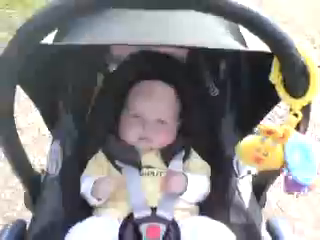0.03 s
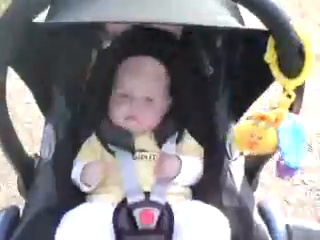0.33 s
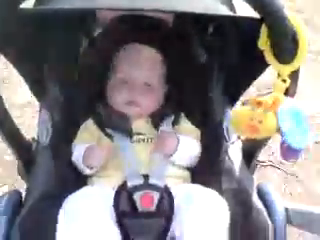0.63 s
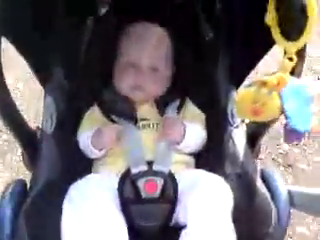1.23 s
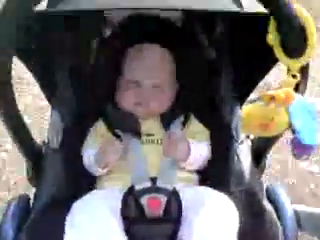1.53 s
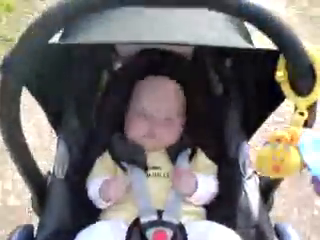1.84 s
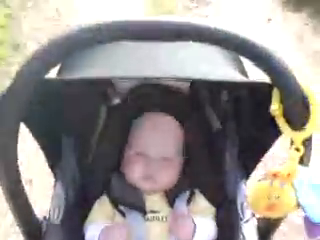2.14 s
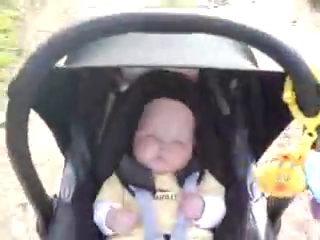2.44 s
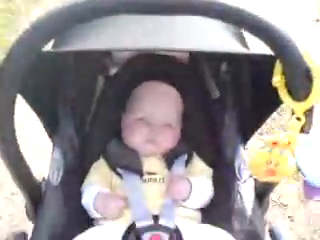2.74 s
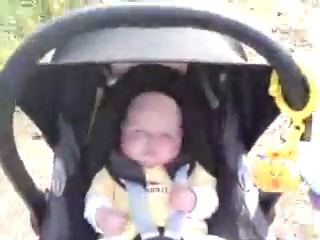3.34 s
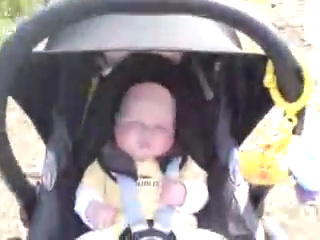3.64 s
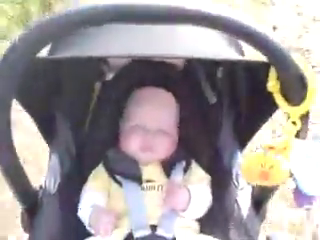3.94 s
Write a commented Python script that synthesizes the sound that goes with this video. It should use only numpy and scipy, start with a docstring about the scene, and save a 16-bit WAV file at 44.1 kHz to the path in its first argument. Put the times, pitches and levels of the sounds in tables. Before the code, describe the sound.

A stroller rolls over gritty ground outdoors, heard from its handle. The wheels crackle and rumble while the plastic frame rattles and knocks, small stones snap and a breeze buffets the microphone.

```python
"""A stroller is pushed over gritty ground, heard from its handle outdoors.
From the start grit crackles under the wheels and a breeze blows on the microphone; the wheels' rumble
and a faint low hum build up over 0.7 s. Meanwhile rough patches begin to shake the plastic frame,
joints knock, stones snap and dull bumps ring the seat shell. Eddies buffet the microphone most around
1 s. Chatter, knocks and snaps go on throughout, with a last burst of hard knocks near 3.6 s."""
import sys
import numpy as np
from scipy.fft import rfft, irfft, next_fast_len
from scipy.io import wavfile
from scipy.ndimage import map_coordinates

SR = 44100
rng = np.random.default_rng(int(sys.argv[2]) if len(sys.argv) > 2 else 0)


def master(y):
    """Save y as 16-bit WAV."""
    cut = np.clip(np.atleast_2d(y).T, -1, 1)
    pcm = np.round(cut * 32767)  # scale
    wavfile.write(sys.argv[1], SR, pcm.astype(np.int16))


N = 176400

# resonances of the plastic frame: frequency_hz, gain_db
FRAME_RESPONSE = [(100, 2), (290, 7.5), (450, 0.5), (600, 2), (800, -3.5), (1100, -3), (1500, 4.5),
                  (2100, 2), (2900, -6.5), (4500, -25.5), (7000, -22.5)]
IMPACT_RISE_S = .0005


def amp(db):
    return 10 ** (np.asarray(db) / 20)


def unit(x):
    return x / np.sqrt(np.mean(x ** 2) + 1e-20)


def curve(rows):
    """Linear interpolation of (time_s, value) rows, one value per sample."""
    return np.interp(np.arange(N) / SR, *np.transpose(rows))


def wobble(per_s):
    """Slow random modulation: a spline through per_s Gaussian knots a second."""
    knots = rng.standard_normal(int(N * per_s / SR) + 4)
    return map_coordinates(knots, [np.arange(N) * per_s / SR])


def coloured(x, points):
    """Minimum-phase filtering of x by (frequency_hz, gain_db) points, scaled to rms 1."""
    m = 2 * next_fast_len(N // 2 + SR // 4)
    hz, db = np.transpose(points)
    gain_db = np.interp(np.log(np.fft.rfftfreq(m, 1 / SR) + 1), np.log(hz), db)
    cepstrum = irfft(np.log(amp(gain_db)), m)
    cepstrum[1:m // 2] *= 2  # folding onto positive time makes the filter causal
    cepstrum[m // 2 + 1:] = 0
    return unit(irfft(rfft(x, m) * np.exp(rfft(cepstrum)), m)[:N])


def noise(points):
    """Spectrally shaped Gaussian noise of rms 1."""
    return coloured(rng.standard_normal(N), points)


def grains(per_s, spread_db, decay_s, top_hz):
    """Shot noise: tiny random impacts, many weak and a few strong, each ringing at its own pitch."""
    when, pitch, strength, phase = rng.random((int(per_s * N / SR), 4)).T
    t = np.arange(SR // 150) / SR
    size = amp(spread_db * np.minimum(-np.log(1 - strength), 4.5))
    tones = np.sin(2 * np.pi * (top_hz * pitch[:, None] * t + phase[:, None]))
    rings = tones * (1 - np.exp(-2 * t / decay_s)) * np.exp(-t / decay_s)
    index = (when * N).astype(int)[:, None] + np.arange(len(t))
    return np.bincount(index.ravel(), (size[:, None] * rings).ravel(), N)[:N]


def ping(t, hz, rise_s, decay_s, sag=0):
    """A damped oscillation with peak near 1; it starts sharp by the fraction sag and settles to hz."""
    t = np.maximum(t, 0)
    envelope = (1 - np.exp(-t / rise_s)) ** 2 * np.exp(-t / decay_s)
    cycles = hz * (t + sag * decay_s * (1 - np.exp(-t / decay_s)))
    return envelope / envelope.max() * np.sin(2 * np.pi * cycles)


def add(track, start_s, sound):
    """Superpose a sound on the track from start_s."""
    part = track[max(round(start_s * SR), 0):][:len(sound)]
    part += sound[:len(part)]


def piece(x, size):
    """A random stretch of x."""
    return x[rng.integers(N - size):][:size]


def under_way(set_off_s=0.68):
    """A linear ramp from 0 to 1 as the stroller gets going."""
    return np.clip(np.arange(N) / SR / set_off_s, 0, 1)


def rolling():
    """Roughness excitation: the wheels grind fine grit and rumble over the uneven ground."""
    # overall gain of the rolling noise: time_s, gain_db
    rolling_gain = [(.05, -36), (.22, -33.5), (.48, -39), (.9, -37), (1.35, -37.5), (1.62, -35.5),
                    (1.83, -40), (2.15, -37.5), (2.45, -36), (2.57, -38.5), (2.95, -35.5), (3.05, -37),
                    (3.2, -33), (3.35, -36.5), (3.5, -33.5), (3.8, -38), (4, -37)]
    # spectrum of ground grit: frequency_hz, gain_db
    grit_spectrum = [(200, -9.5), (600, 0.5), (800, -1), (1100, 0), (1500, 3.5), (2200, 5), (2700, -4),
                     (3600, -0.5), (4400, -2.5), (5300, -3), (6600, -5.5), (7100, -17)]
    # spectrum of the wheel rumble: frequency_hz, gain_db
    rumble_spectrum = [(25, -24.5), (60, 6), (115, 4.5), (190, -3.5), (290, -2.5), (420, -11.5),
                       (800, -16.5), (2000, -41)]
    unevenness = wobble(per_s=45)  # modulates crackle and rumble alike
    grit = grains(per_s=1900, spread_db=3.6, decay_s=.00055, top_hz=7170)
    crackle = amp(-2.5 + 1.1 * unevenness) * coloured(grit, grit_spectrum)
    hiss = amp(-4) * noise(grit_spectrum)
    swing_db = 2.4 * unit(unevenness + wobble(per_s=18))
    rumble = amp(2.5 + swing_db) * noise(rumble_spectrum)
    return amp(curve(rolling_gain)) * (crackle + hiss + under_way() * rumble)


def wind():
    """Turbulent pressure on the microphone: a breeze, and eddies that each push between two suctions."""
    # strength of the breeze: time_s, level_db
    breeze = [(.5, -34), (.8, -23), (.95, -30.5), (1.13, -21), (1.25, -31.5), (1.8, -30.5), (2.06, -25),
              (2.2, -34.5), (2.58, -30), (2.8, -34.5)]
    # spectrum of the turbulence: frequency_hz, gain_db
    turbulence = [(12, -23), (28, 2.5), (65, -3), (130, -4.5), (210, -14), (400, -52.5), (1000, -60.5)]
    # pressure pulses of single eddies: centre_s, peak_db
    eddies = [(0.178, -16), (0.669, -16.5), (0.753, -12.5), (0.79, -13.5), (0.872, -11), (1.001, -12.5),
              (1.037, -17), (1.104, -10.5), (1.945, -13), (2.023, -15.5), (2.091, -12), (2.565, -14.5),
              (2.617, -20)]
    t = np.arange(N) / SR
    flutter = amp(3 * wobble(per_s=24.98))
    out = amp(curve(breeze)) * unit(flutter * noise(turbulence))
    for centre_s, peak_db in eddies:
        half_width_s = .0038 * np.exp(rng.normal(0, 0.24))
        offset = (t - centre_s) / half_width_s
        out += amp(peak_db) * (1 - offset ** 2) * np.exp(-.5 * offset ** 2)
    return out


def hum(pitch_hz=215.7, level_db=-42):
    """A faint low tone with slight frequency and amplitude modulation, rising with the rumble."""
    phase = 2 * np.pi * np.cumsum(pitch_hz + .5 * wobble(per_s=1.917)) / SR
    waver = amp(2.5 * wobble(per_s=2))
    return amp(level_db) * unit(under_way() * waver * np.sin(phase))


def rough_patches(rise_s=0.0031, fall_s=0.0089):
    """Forced vibration: each rough patch makes the frame chatter while coarser grit is crushed."""
    # rough stretches of ground: start_s, length_s, chatter_db, grit_db
    patches = [(0.05, 0.022, -31, -45), (0.902, 0.061, -28.5, -41.5), (1.072, 0.091, -32.5, -38),
               (1.177, 0.013, -31.5, -37), (1.404, 0.071, -30.5, -51), (1.493, 0.045, -36, -68),
               (1.628, 0.092, -28.5, -45), (1.766, 0.014, -27, -45), (1.892, 0.038, -30.5, -33),
               (1.94, 0.04, -30, -46), (2.204, 0.026, -25.5, -29.5), (2.257, 0.036, -28, -32),
               (2.32, 0.023, -36, -36.5), (2.473, 0.01, -30, -41), (2.676, 0.055, -33, -45),
               (2.776, 0.015, -29.5, -29), (2.89, 0.082, -32, -39), (3.09, 0.047, -32, -38),
               (3.218, 0.072, -29, -49), (3.542, 0.023, -33, -37), (3.604, 0.041, -28, -46),
               (3.905, 0.025, -28.5, -38), (3.956, 0.0087, -22.5, -61)]
    # spectrum of crushed grit: frequency_hz, gain_db
    crush_spectrum = [(500, -22), (2000, -9), (3500, 2), (5500, 2.5), (6800, -5.5)]
    t, shake, crush = np.arange(N) / SR, np.zeros(N), np.zeros(N)
    for start_s, length_s, chatter_db, grit_db in patches:
        attack = np.clip((t - start_s) / rise_s, 0, 1)
        envelope = attack * np.exp(-np.maximum(t - start_s - length_s, 0) / fall_s)
        shake += amp(chatter_db) * envelope
        crush += amp(grit_db) * envelope
    chatter = grains(per_s=520, spread_db=2, decay_s=0.00061, top_hz=2907)
    crumbs = grains(per_s=12000, spread_db=3, decay_s=0.0012, top_hz=6910)
    return shake * coloured(chatter, FRAME_RESPONSE) + crush * coloured(crumbs, crush_spectrum)


def knocks(gain_db=-2, decay_s=.0011, rebound_s=0.002606, tail_s=0.0052):
    """Impact and rebound: a loose joint strikes twice and excites the frame and the seat shell."""
    # blows in the plastic joints: start_s, relative_level_db, pitch_hz
    blows = [(0.065, -19.5, 1630), (0.0691, -18, 1500), (0.1885, -14, 790), (0.2376, -19, 1810),
             (0.2978, -15.5, 1470), (0.786, -22, 2420), (0.9076, -9, 1640), (1.1389, -17, 2020),
             (1.414, -16, 1810), (1.4219, -12.5, 1330), (1.4477, -18, 1560), (1.504, -19, 1690),
             (1.65, -19, 2130), (1.7744, -16.5, 1480), (1.89, -18.5, 2100), (1.9502, -20.5, 1690),
             (1.978, -19, 1690), (2.0944, -11, 2100), (2.4837, -17.5, 1570), (2.4904, -13.5, 1750),
             (2.5085, -13.5, 1540), (2.6868, -15.5, 1650), (2.7185, -11, 1840), (2.732, -17, 2200),
             (2.7697, -12.5, 1370), (3.1695, -17.5, 1940), (3.2294, -18, 1990), (3.2404, -18, 2200),
             (3.2664, -15, 1640), (3.2727, -15.5, 1520), (3.3085, -12, 1820), (3.397, -15.5, 2240),
             (3.5935, -8.5, 2010), (3.6083, -11.5, 1670), (3.614, -10, 1600), (3.6325, -17, 2060),
             (3.6388, -16.5, 1460), (3.811, -17.5, 1790), (3.9599, -12, 1490)]
    out, t, frame = np.zeros(N), np.arange(SR // 25) / SR, noise(FRAME_RESPONSE)
    for start_s, level_db, pitch_hz in blows:
        stretch, detune = np.exp(rng.normal(0, [.25, .12]))
        hit = ping(t, pitch_hz, IMPACT_RISE_S, decay_s, sag=.12)
        rebound = amp(-5) * ping(t - rebound_s * stretch, pitch_hz * detune, IMPACT_RISE_S, decay_s)
        tail = amp(-8) * np.exp(-t / tail_s) * piece(frame, len(t))
        add(out, start_s, amp(level_db + gain_db) * (hit + rebound + shell_ring(t) + tail))
    return out


def shell_ring(t):
    """Free vibration: two modes of the hollow seat shell die away after a blow."""
    modes = [(590, -23), (940, -20.5)]  # pitch_hz, relative_level_db
    return sum(amp(db + rng.normal(0, 1)) * ping(t, hz, IMPACT_RISE_S, decay_s=.009) for hz, db in modes)


def snaps(gain_db=-3, splinter_s=.0018):
    """Brittle fracture: a stone gives way with a sharp tick and a spray of splinters."""
    # stones breaking under the wheels: start_s, relative_level_db, pitch_hz
    fractures = [(0.1248, -7.5, 3740), (.140, -12.5, 4730), (0.188, -19.5, 4640), (0.275, -8, 4440),
                 (0.2835, -13, 4470), (0.2947, -7, 4060), (0.2997, -5, 4870), (0.436, -17, 5470),
                 (0.5171, -10.5, 2330), (.652, -17.5, 3860), (.928, -7, 3470), (1.054, -16, 2200),
                 (1.0831, -10.5, 3130), (1.185, -15, 3300), (1.354, -21, 5650), (1.6933, -13, 2470),
                 (1.7751, -17.5, 3830), (2.2632, -11.5, 5400), (2.407, -17.5, 4040), (2.994, -14, 2440),
                 (3.098, -19, 2600), (3.1678, -13.5, 2490), (3.3086, -12, 3700), (3.573, -15.5, 4700)]
    # spectrum of the splinters: frequency_hz, gain_db
    splinter_spectrum = [(200, -5), (700, -7), (1500, -4), (4000, -0.5), (7000, -7)]
    out, t, spray = np.zeros(N), np.arange(SR // 40) / SR, noise(splinter_spectrum)
    for start_s, level_db, pitch_hz in fractures:
        tick = ping(t, pitch_hz, rise_s=.00015, decay_s=.0008)
        splinters = amp(-1.5) * np.exp(-t / splinter_s) * piece(spray, len(t))
        add(out, start_s, amp(level_db + gain_db) * (tick + splinters))
    return out


def bumps(decay_cycles=3):
    """Heavily damped resonance: a wheel drops, the chassis thuds and the seat shell rings."""
    # wheel drops felt through the chassis: start_s, relative_level_db, pitch_hz
    drops = [(0.187, -19.5, 593), (.908, -29.5, 453), (.276, -21, 600), (1.695, -25, 400),
             (2.271, -19, 320), (2.715, -17, 550), (3.272, -13.5, 220), (3.613, -19, 530)]
    out, t = np.zeros(N), np.arange(SR // 12) / SR
    for start_s, level_db, hz in drops:
        resonance = [(hz / 4, -7), (hz, 0), (hz * 1.16, -4), (hz * 4, -30)]  # frequency_hz, gain_db
        envelope = (1 - np.exp(-t / IMPACT_RISE_S)) * np.exp(-t * hz / decay_cycles)
        thud = envelope * piece(noise(resonance), len(t))
        add(out, start_s, amp(level_db) * (thud + amp(7.5) * shell_ring(t)))
    return out


def scene():
    """Superposition of all sources at one microphone on the handle."""
    return (rolling() + rough_patches() + knocks() + snaps() + bumps() + wind() + hum())[None]


def record(dry, start_s=0.037, fade_s=0.036, cutoff_hz=6900):
    """Band limiting: the sound fades in and passes through a steep low-pass filter."""
    fade = np.clip((np.arange(N) / SR - start_s) / fade_s, 0, 1)
    m = next_fast_len(N + SR // 2)
    lowpass = 1 / np.sqrt(1 + (np.fft.rfftfreq(m, 1 / SR) / cutoff_hz) ** 70)
    return irfft(rfft(dry * fade, m) * lowpass, m)[..., :N]


dry = scene()
out = record(dry)
master(out)
```